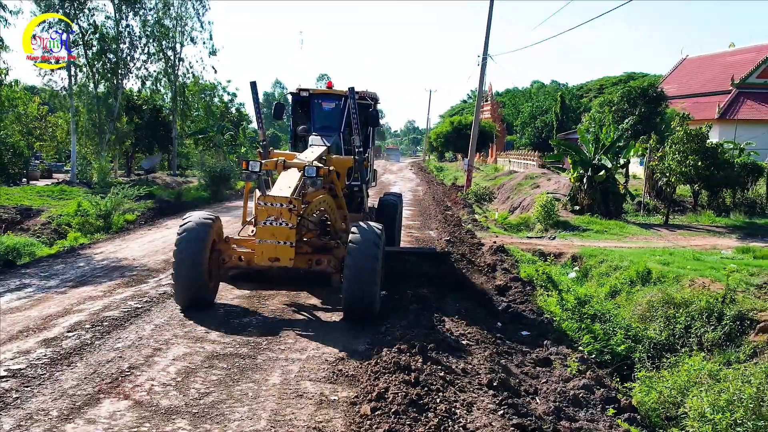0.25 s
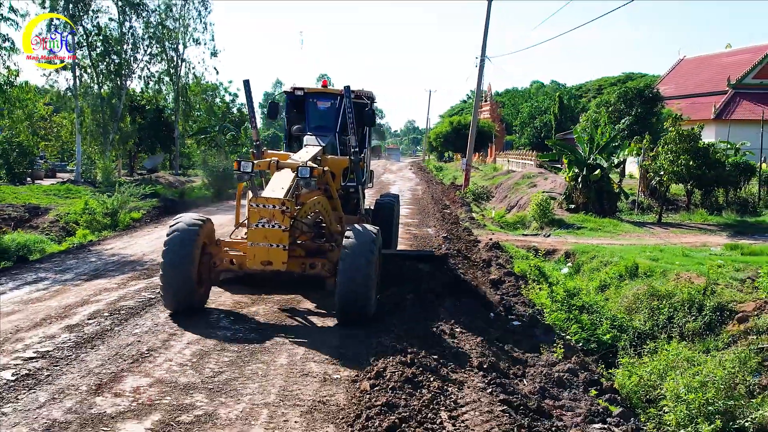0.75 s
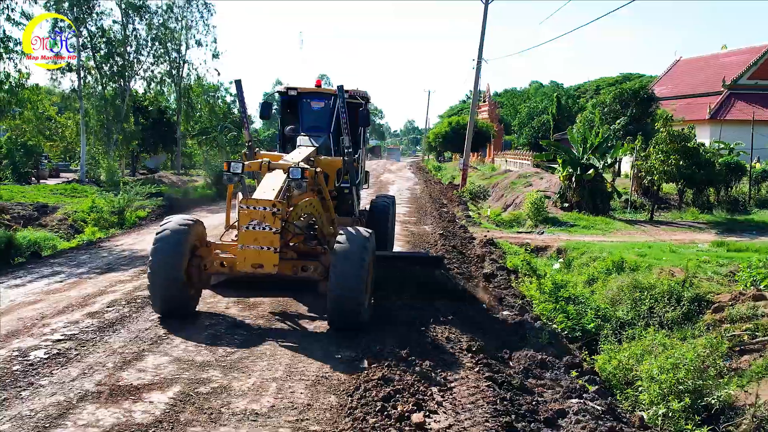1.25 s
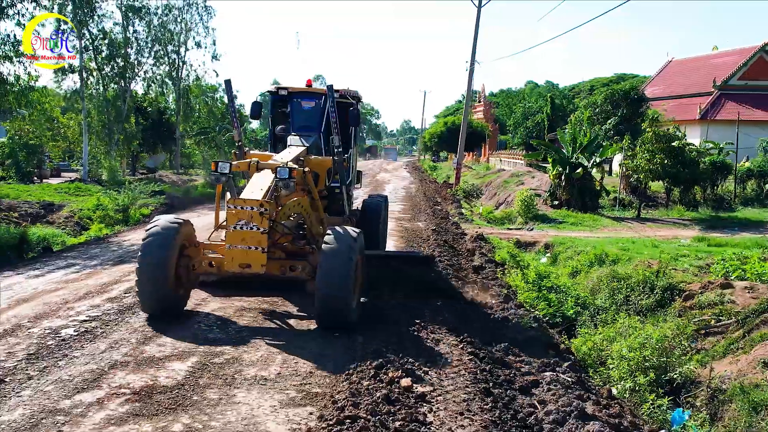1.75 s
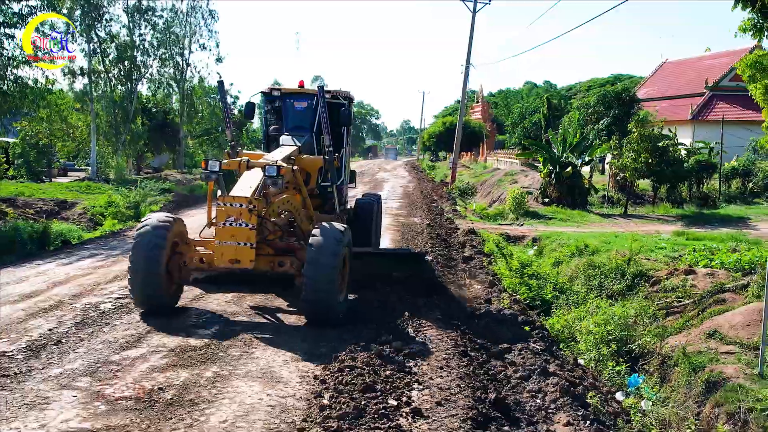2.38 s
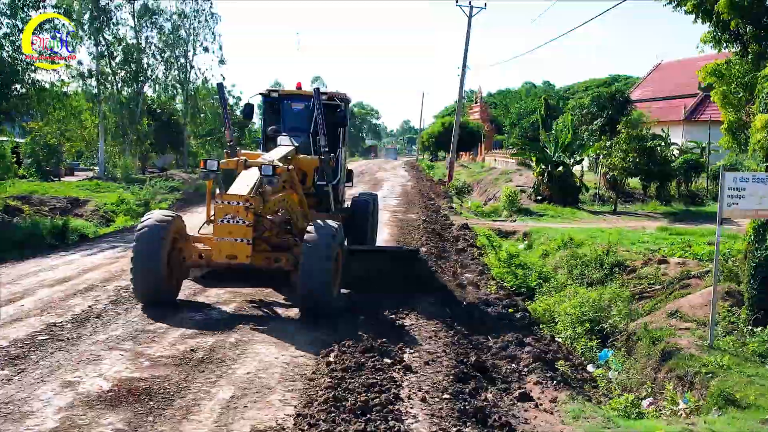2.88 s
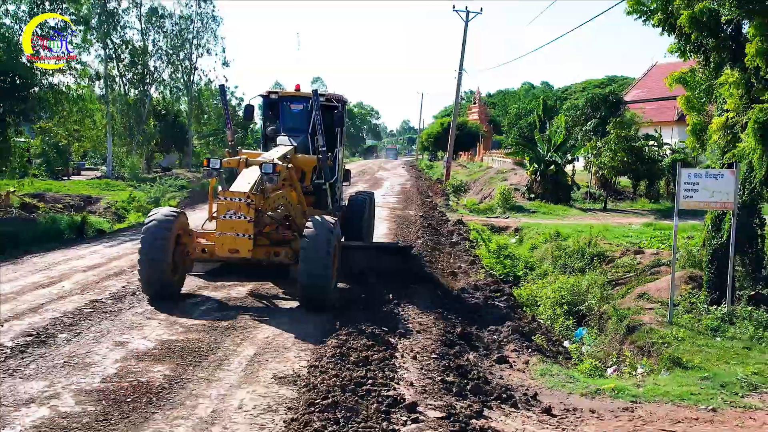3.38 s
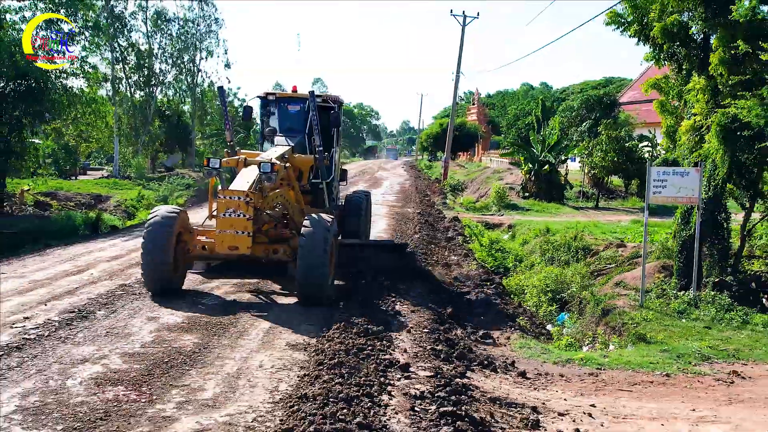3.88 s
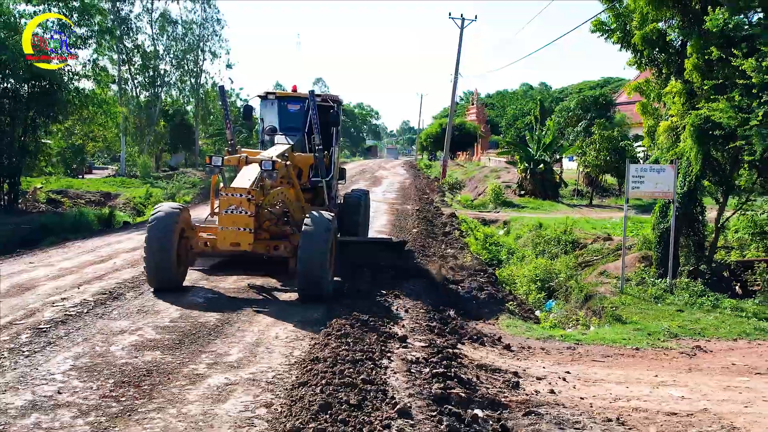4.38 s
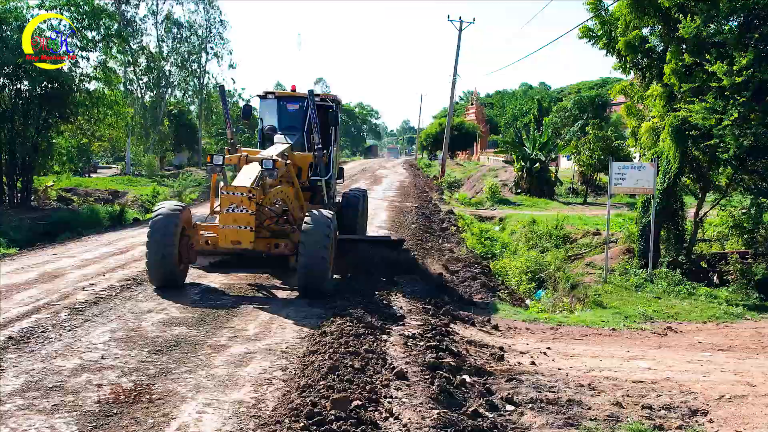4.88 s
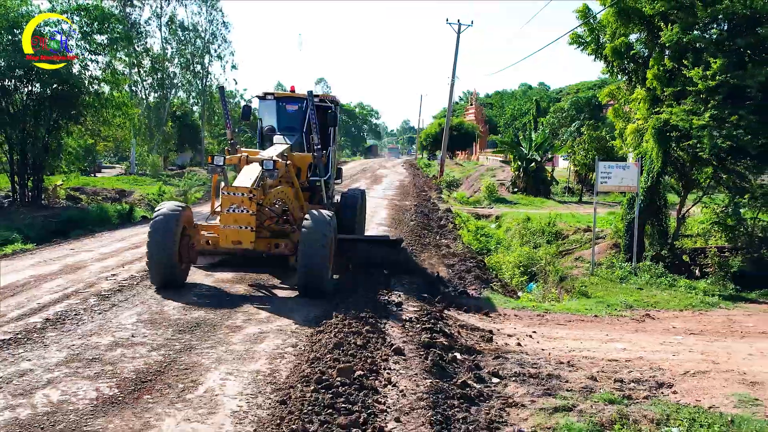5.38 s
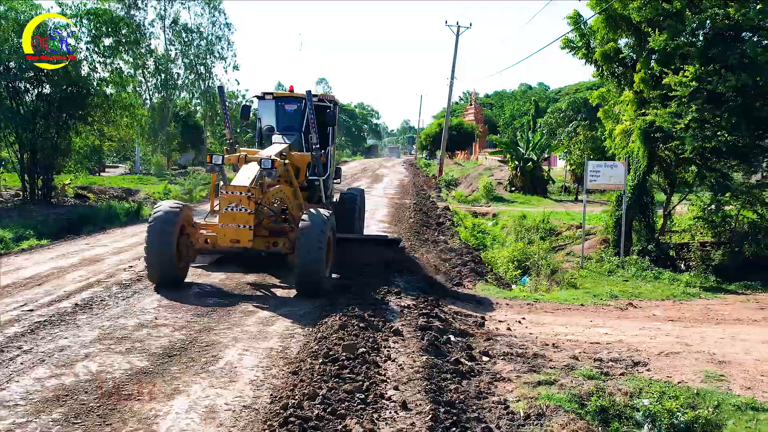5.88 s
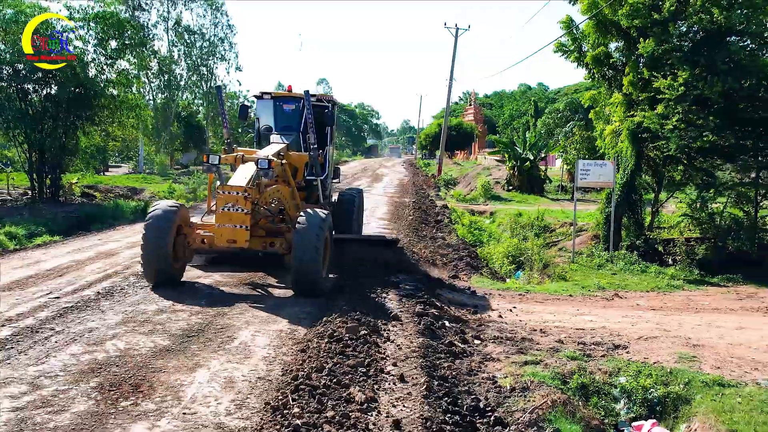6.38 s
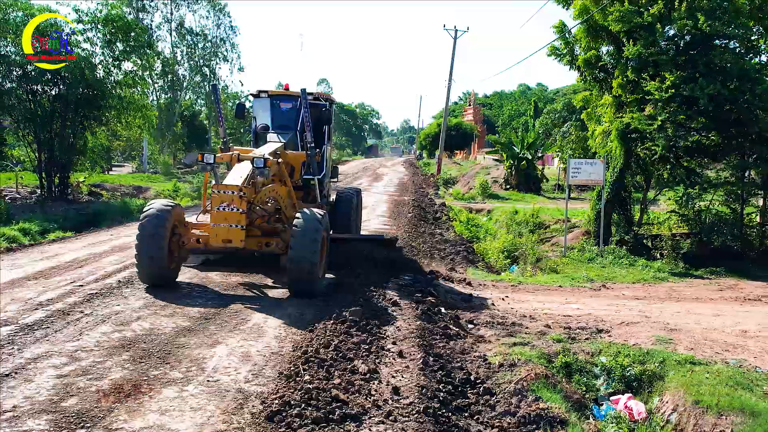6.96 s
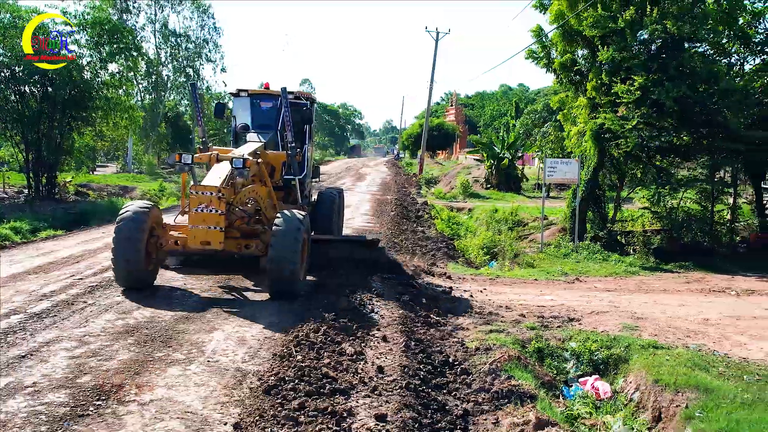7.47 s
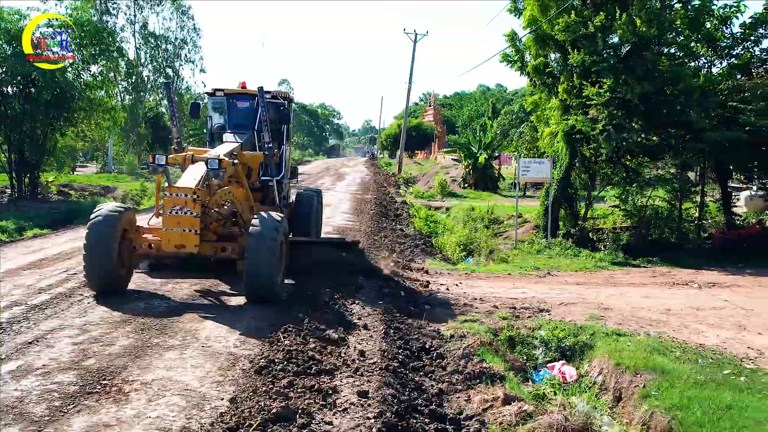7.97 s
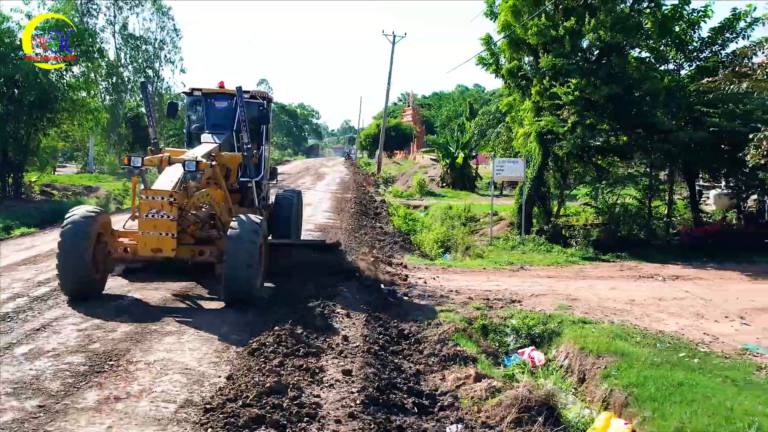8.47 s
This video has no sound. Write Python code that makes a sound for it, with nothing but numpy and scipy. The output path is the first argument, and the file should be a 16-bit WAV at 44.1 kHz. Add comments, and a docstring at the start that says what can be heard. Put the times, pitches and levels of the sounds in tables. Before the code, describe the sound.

A road grader runs on a dirt road some metres from the microphone for the whole of nearly nine seconds. Its diesel engine makes a steady, rough roar with a strong low fan hum and a high gear whine, both wavering slightly in pitch. The whine is loudest at about 1.2 seconds and weaker after 5 seconds. A first gust of wind bumps the microphone at about 1.5 seconds. From 3 seconds the wind buffets irregularly, with low thumps, knock-like pops and short crackles, hitting hard around 3.5 seconds. A very faint, high rustle sounds close by between 4 and 5 seconds. More gusts and pops come from about 5.8 to 6.8 seconds. After a short lull, the densest run of buffeting and crackling lasts from 8 seconds to the end, with the engine still droning underneath.

```python
"""A road grader works its six-cylinder diesel some metres away on a dirt road.
Firing, fan blades and a hunting gear mesh sing over the roar of engine and blade;
the ground bounce cancels a drifting band of that roar. Wind eddies buffet the microphone
in gusts, pops and crackles. A short rustle sounds close by, over a faint rumble."""
import sys
import numpy as np
from scipy import signal
from scipy.fft import rfft, irfft, next_fast_len
from scipy.io import wavfile
from scipy.ndimage import uniform_filter1d, minimum_filter1d

SR = 44100
rng = np.random.default_rng(int(sys.argv[2]) if len(sys.argv) > 2 else 0)


def transcribe(u):
    """Save the signal u as a 16-bit wav file named by the first command-line argument.

    u: samples, shape (n,) or (channels, n), limited to [-1, 1]; the rate is SR.
    q: integer samples, one column per channel.
    """
    v = np.clip(np.atleast_2d(u).T, -1, 1)
    q = np.round(v * 32767).astype(np.int16)
    wavfile.write(sys.argv[1], SR, q)


N = 384993

# rustle bunches: start/s, end/s, level/dB
RUSTLE_BUNCHES = [(4.08, 4.1, -67), (4.197, 4.25, -63), (4.324, 4.5, -57.5), (4.6, 4.62, -61),
                  (4.715, 4.82, -59.5), (4.96, 4.97, -65)]
# rustle spectrum: f/Hz, relative density/dB
RUSTLE_SPECTRUM = [(5500, -25), (7000, -2), (9500, 0.5), (12500, -2.5), (15500, -8)]

# gusts: t/s, peak level/dB, time to fall 10 dB/s (floored at 0.01)
GUSTS = [(1.47, -25, 0.3), (1.62, -30.5, 1.1), (2.0, -32, 0.9), (2.3, -31.5, 0.1), (3.11, -24, 0),
         (3.19, -25, 0.5), (3.3, -21.5, .15), (3.5, -14, 0.08), (3.7, -26, 0.5), (3.84, -26, 0.02),
         (3.93, -23, 0), (4.16, -26, 0.23), (4.24, -20.5, .07), (4.39, -25, 0.13), (4.6, -31.5, 3),
         (5.0, -30, 0.5), (5.14, -27.5, 0.35), (5.3, -27, 0.33), (5.55, -29, 0.4), (5.791, -18, .06),
         (5.9, -21.5, 0), (6.02, -21.5, 0.18), (6.171, -23, -0.2), (6.54, -24.5, 0.05), (6.65, -18, .15),
         (6.78, -25.5, .1), (7.13, -25.5, 0.02), (7.7, -30, .2), (7.779, -23.5, 0.27), (8.0, -19, 0.3),
         (8.1, -17, -0.03), (8.3, -22, .3), (8.45, -21.5, 0.2), (8.56, -19, .2), (8.66, -18.5, 0.3)]
# buffeting spectra, lows and upper edge: f/Hz, relative density/dB
WIND_LOW_SPECTRUM = [(25, -34), (50, -7.5), (85, 4), (150, 6.5), (300, 0), (500, -7), (900, -40.5)]
WIND_EDGE_SPECTRUM = [(300, -10), (550, -4), (900, -4), (1600, -19), (3000, -38), (4200, -56)]
# wind pops: t/s, amplitude (+ push, - pull), centre f/Hz
POPS = [(1.469, -0.43, 230), (3.0909, -0.42, 140), (3.1082, 0.44, 170), (3.18, .5, 171), (3.254, -0.1, 130),
        (3.5163, .7, 120), (3.557, -0.78, 140.1), (3.571, 0.57, 250), (3.593, -1.3, 220),
        (4.0365, -.37, 360), (4.3967, 0.48, 129.4), (5.756, 0.04, 120), (5.7944, .69, 240),
        (5.8849, 1, 140), (6.0004, 0.49, 280), (6.181, 0.54, 430), (6.4385, -.34, 130), (6.5418, 0.46, 170),
        (6.5715, 0.58, 120), (6.6528, -0.57, 240), (6.7907, 0.78, 240), (6.861, .4, 290),
        (7.1106, -0.28, 220), (8.0441, -0.7, 211), (8.0891, -0.92, 430), (8.1007, 0.8, 470),
        (8.1291, 0.45, 370), (8.2809, -0.62, 300), (8.3074, -.38, 460), (8.3537, -0.6, 180),
        (8.4332, -0.48, 200), (8.473, -.53, 240), (8.4928, -1, 171.3), (8.5497, .57, 300),
        (8.6571, -0.69, 216)]
# crackles in the gusts: t/s, level/dB
CRACKLES = [(3.468, -9.5), (3.543, -8.5), (3.567, -16), (4.232, -15), (4.394, -16.5), (5.998, -24),
            (6.179, -15.5), (6.645, -12), (7.75, -34), (8.088, -13), (8.307, -14.5), (8.43, -12.5),
            (8.472, -14.5), (8.547, -10), (8.584, -12.5), (8.621, -16.5)]
# crackle spectrum: f/Hz, relative density/dB
CRACKLE_SPECTRUM = [(350, -8.5), (700, 5), (1500, -12.5), (2600, -26.5), (4000, -45), (4600, -66)]

# roar of engine and blade: t/s, level/dB
ROAR_LEVEL = [(0.0, -34.5), (0.61, -34.5), (2.99, -37.5), (3.5, -35.5), (3.62, -42), (4.08, -43.5),
              (4.33, -40), (5.52, -38.5), (5.71, -35.5), (5.93, -40.5), (8.34, -38.5), (8.58, -43),
              (8.73, -43)]
# rasp, also steering the gear's second harmonic: t/s, level/dB re roar
RASP_LEVEL = [(0, -18), (1.9, -14.5), (2.9, -12.5), (3.6, -11.5), (4.8, -10.5), (5.6, -10.5), (7.0, -14),
              (7.55, -10), (8.73, -14)]
# treble chatter: t/s, level/dB
CHATTER_LEVEL = [(0, -53), (1.95, -69), (2.92, -76.5), (3.5, -72), (3.7, -88.5), (5.15, -89.5), (5.6, -72),
                 (7.25, -65), (7.6, -69), (8.73, -73)]
# machine noise spectra: f/Hz, relative density/dB
ROAR_SPECTRUM = [(40, -39.5), (75, -11), (110, -9.5), (170, 2), (260, -9), (450, -14), (900, -13.5),
                 (1400, -15), (2100, -18.5), (2700, -38.5), (3250, -50), (3500, -55), (4400, -62.5),
                 (4900, -92), (6000, -61)]
RASP_SPECTRUM = [(2000, -8.5), (2450, -5), (2900, -14), (3300, -22.5)]
CHATTER_SPECTRUM = [(3600, -19), (3740, -3), (3820, -9.5), (3900, 0), (4020, -6), (4200, -21.5)]
HISS_SPECTRUM = [(5800, -39.5), (6400, 1.5), (7500, 2), (8800, -3), (9400, -14), (10200, -7),
                 (11500, -22.5), (13500, -29), (15500, -35.5)]
# ground-bounce notch: t/s, f/Hz, share removed (0-1)
GROUND_NOTCH = [(0, 1300, 0.43), (1.4, 1380, 0.66), (2.4, 1557, .6), (3.2, 1515, 0.66), (3.8, 1420, 0.5),
                (4.8, 1550, 0.26), (5.3, 1285, 0.8), (6.5, 1320, 0.8), (7.3, 1400, 0.57), (8.1, 1390, 0.56)]

# gear mesh, mean tooth rate: t/s, f/Hz
TOOTH_RATE = [(0, 1116), (1.3, 1114), (2.15, 1144), (2.8, 1086), (3.25, 1057), (3.7, 1087), (4.6, 1091),
              (5.3, 1060), (6.5, 1058), (6.9, 1071), (7.2, 1110), (7.5, 1106), (8.1, 1072), (8.73, 1056)]
# hunting of the tooth rate: t/s, phase/cycles, swing either way/Hz
GEAR_HUNT = [(.13, 1.5, 5.4), (1.02, 2, 11), (1.85, 4, 7), (2.98, 7, 7.2), (3.73, 9, 6), (4.76, 12, 9),
             (5.14, 13, 13.3), (5.6, 14, 10), (6.37, 16, 5.4), (7.2, 18, 5.8), (7.52, 19, 9.3),
             (7.93, 20, 8), (8.62, 22, 8.5)]
# mesh fundamental: t/s, level/dB
GEAR_LEVEL = [(0.0, -34), (0.34, -22), (1.0, -22.5), (1.22, -16.5), (1.63, -24.5), (1.82, -33),
              (2.38, -28.5), (2.55, -39.5), (2.7, -25.5), (4.08, -28), (4.16, -24), (5.23, -25), (5.3, -34),
              (5.69, -26), (5.81, -34.5), (7.25, -33.5), (7.29, -27), (7.71, -39), (7.93, -27.5),
              (8.73, -33)]
# mesh harmonics 3-7 as casing and microphone pass them: f/Hz, level/dB re roar
CASING_RESPONSE = [(3180, -21.5), (3330, -22.5), (3450, -30), (4230, -27.5), (4360, -33), (4600, -47),
                   (5280, -47), (5550, -32), (5750, -34), (6350, -25), (6520, -35.5), (6700, -25),
                   (7600, -34)]
# fan: t/s, blade rate/Hz, level/dB
FAN = [(0, 241.6, -20), (.4, 238.4, -18), (1.2, 236.9, -15.5), (2.14, 238.4, -16), (2.36, 227.3, -21),
       (2.6, 224.3, -16), (2.8, 221.8, -19.5), (3.25, 222, -17), (3.47, 230.7, -25), (4.72, 229.4, -27.5),
       (4.88, 218.3, -18.5), (5.3, 222.1, -19), (6.2, 226.6, -25.5), (7.0, 229.6, -23.5), (7.5, 233, -21),
       (8.1, 233.2, -24.5), (8.73, 228.5, -23)]
# crank orders (3 is the firing): order, mean level/dB, flutter share (0-1)
CRANK_ORDERS = [(3, -32, 0.09), (5, -35.5, 0.7), (6, -36.5, 1)]

FAN_BLADES, FIRINGS_PER_TURN = 7, 3


def undb(db):
    """dB to gain."""
    return 10 ** (np.asarray(db) / 20)


def tracks(table):
    """Each column after t, interpolated per sample."""
    times_s, *columns = np.transpose(table)
    return [np.interp(np.arange(N) / SR, times_s, column) for column in columns]


def colour(x, points, lo_hz, hi_hz):
    """Filter x by (f/Hz, level/dB) points; rms 1 within lo_hz..hi_hz."""
    n = next_fast_len(N, True)
    bin_hz = np.arange(n // 2 + 1) * SR / n + 1
    hz, db = np.transpose(points)
    gain_db = np.interp(np.log(bin_hz), np.log(hz), db, left=-90, right=-90)
    spectrum = rfft(np.pad(x, (0, n - N), "reflect")) * undb(gain_db)
    band = (bin_hz > lo_hz) & (bin_hz < hi_hz)
    return irfft(spectrum, n)[:N] * n / np.sqrt(2 * np.sum(np.abs(spectrum[band]) ** 2))


def wander(rate_hz):
    """Random steps at rate_hz, smoothed twice; spread near 1."""
    hold = int(SR / rate_hz)
    steps = np.repeat(rng.standard_normal(N // 40), hold)[:N]
    return 1.3 * uniform_filter1d(uniform_filter1d(steps, hold), hold)


def tone(hz, rms_db, flutter, flutter_hz):
    """Sine that fades and slurs: a power share, flutter, arrives by shifting paths."""
    share = np.clip(flutter, 0, 1)
    paths = np.sqrt(1 - share) + np.sqrt(share / 2) * (wander(flutter_hz) + 1j * wander(flutter_hz))
    return np.sqrt(2) * undb(rms_db) * np.imag(paths * np.exp(2j * np.pi * np.cumsum(hz) / SR))


def patchy(x, depth_db, bins, frames):
    """Random swells in patches of bins (86 Hz each) by frames (6 ms each); rms kept."""
    *_, cells = signal.stft(np.pad(x, (0, 512), "reflect"), nperseg=512)
    field = uniform_filter1d(rng.standard_normal(cells.shape), bins, axis=0)
    field = uniform_filter1d(field, frames, axis=1)
    out = signal.istft(cells * undb(depth_db * field / field.std()), nperseg=512)[1][:N]
    return out * x.std() / out.std()


def swells(start_s, end_s, db, rise_s, fall_s, floor_db):
    """Envelope in dB of held swells, 10 dB per rise_s or fall_s on the flanks; powers add."""
    t = np.arange(0, N, 64) / SR
    start_s, end_s, db, fall_s = (np.reshape(c, (-1, 1)) for c in (start_s, end_s, db, fall_s))
    before_db = 10 * np.maximum(start_s - t, 0) / rise_s
    after_db = 10 * np.maximum(t - end_s, 0) / np.maximum(fall_s, .01)
    power = np.sum(undb(db - before_db - after_db) ** 2, axis=0) + undb(floor_db) ** 2
    return np.interp(np.arange(N) / SR, t, 10 * np.log10(power))


def rumble():
    """Faint steady noise below 60 Hz."""
    spectrum = [(4, -3.5), (25, -3), (45, -0.5), (60, -18)]  # f/Hz, relative density/dB
    return undb(-65.5) * colour(rng.standard_normal(N), spectrum, 20, 45)


def rustle():
    """Dense tiny treble clicks in bunches; faint ones throughout."""
    level_db = swells(*np.transpose(RUSTLE_BUNCHES), rise_s=0.054, fall_s=0.054, floor_db=-80)
    grains = rng.standard_normal(N) * undb(2.8 * wander(200))
    clicks = colour(grains, RUSTLE_SPECTRUM, 10500, 15500)
    return undb(level_db) * patchy(clicks, depth_db=2.1, bins=12, frames=4)


def crackles():
    """Bright bursts in the gusts, quick to start and die; the microphone port dulls them."""
    attack_s, t60_s = 0.0014, .047
    grit = colour(rng.standard_normal(N), CRACKLE_SPECTRUM, 670, 2500)
    envelope = np.zeros(N)
    t = np.arange(SR // 10) / SR
    for start_s, db in CRACKLES:
        i = int(start_s * SR)
        burst = np.minimum(t / attack_s, 1) * undb(db - 60 * t / t60_s)
        envelope[i:i + len(t)] += burst[:N - i]
    return signal.sosfilt(signal.butter(8, 3900, fs=SR, output="sos"), grit * envelope)


def pops():
    """The biggest eddies: one peaked push or pull each, with a rebound either side."""
    out = np.zeros(N)
    half = 700
    t = np.arange(-half, half) / SR
    for centre_s, amplitude, hz in POPS:
        u = np.pi * hz * t
        pulse = (1 - 2 * u ** 2) * np.exp(-u ** 2)
        tip = (1 - 2 * (3 * u) ** 2) * np.exp(-(3 * u) ** 2)
        i = int(centre_s * SR)
        out[i - half:i + half] += amplitude * (pulse + .15 * tip)
    return out


def wind():
    """Eddies hit the microphone port in lumps of a few ms, shared by lows and upper edge."""
    rise_s, edge_max_fall_s, calm_db = 0.074, .25, -48.5
    peak_s, peak_db, fall_s = np.transpose(GUSTS)
    low_db = swells(peak_s, peak_s, peak_db, rise_s, fall_s, calm_db)
    edge_peak_db = peak_db - 7 + 0.24 * (peak_db + 22)  # harder gusts are brighter
    edge_db = swells(peak_s, peak_s, edge_peak_db, rise_s, np.minimum(fall_s, edge_max_fall_s), calm_db)
    eddies = rng.standard_normal(N) * undb(8.1 * np.tanh(wander(90) / 2))
    low = colour(eddies, WIND_LOW_SPECTRUM, 249.5, 420)
    fine_eddies = eddies * undb(8.3 * np.tanh(wander(150) / 2))
    edge = colour(fine_eddies, WIND_EDGE_SPECTRUM, 410, 950)
    port_leak = signal.butter(2, 45, "high", fs=SR, output="sos")
    return signal.sosfilt(port_leak, undb(low_db) * low + undb(edge_db) * edge + pops())


def chatter():
    """Faint patchy noise near 3.9 kHz."""
    (level_db,) = tracks(CHATTER_LEVEL)
    band = colour(rng.standard_normal(N), CHATTER_SPECTRUM, 3600, 4100)
    return undb(level_db) * patchy(band, depth_db=5.5, bins=2, frames=5)


def ground_bounce(x):
    """The ground reflection partly cancels a drifting band."""
    notch_hz, share = tracks(GROUND_NOTCH)
    carrier = np.exp(2j * np.pi * np.cumsum(notch_hz) / SR)
    baseband = signal.filtfilt(*signal.butter(1, 110, fs=SR), x / carrier)
    return x - share * 2 * np.real(carrier * baseband)


def roar(crank_hz, roar_db, rasp_re_roar_db):
    """Engine and blade noise, lightly pulsed by the firing; rasp and hiss above it."""
    hiss_re_roar_db = -19
    firing_rad = 2 * np.pi * np.cumsum(FIRINGS_PER_TURN * crank_hz) / SR
    drive = rng.standard_normal(N) * (1 + 0.031 * np.cos(firing_rad)) * undb(0.61 * wander(12))
    body = ground_bounce(colour(drive, ROAR_SPECTRUM, 1483, 1906))
    rasp = patchy(colour(drive, RASP_SPECTRUM, 2310, 3300), depth_db=4.5, bins=2, frames=8)
    hiss_drive = rng.standard_normal(N) * undb(0.7 * wander(9))
    hiss = patchy(colour(hiss_drive, HISS_SPECTRUM, 6800, 9000), depth_db=2.6, bins=2, frames=10)
    return undb(roar_db) * (body + undb(rasp_re_roar_db) * rasp + undb(hiss_re_roar_db) * hiss)


def gear_whine(roar_db, rasp_re_roar_db):
    """Teeth mesh at a hunting rate; harmonics 2-7 flare and flutter."""
    (mean_hz,) = tracks(TOOTH_RATE)
    hunt_cycles, swing_hz = tracks(GEAR_HUNT)
    tooth_hz = mean_hz + swing_hz * np.cos(2 * np.pi * hunt_cycles)
    (gear_db,) = tracks(GEAR_LEVEL)
    flutter = 0.043 * undb(-19.5 - gear_db)  # shifting paths show as the direct whine weakens
    out = tone(tooth_hz, gear_db, flutter, flutter_hz=30)
    second_db = roar_db + rasp_re_roar_db + 8 + 2.1 * wander(9)
    out += tone(2 * tooth_hz, second_db, flutter=.9, flutter_hz=60)
    for k in range(3, 8):
        casing_db = np.interp(k * tooth_hz, *np.transpose(CASING_RESPONSE))
        flare_db = 4.5 * wander(9)
        out += tone(k * tooth_hz, roar_db + casing_db + flare_db, flutter=.9, flutter_hz=22 * k)
    return out


def fan(blade_hz, fan_db):
    """Blade-pass tone; its second harmonic grows as the fan slows."""
    second_db = -40.5 + .8 * (228 - blade_hz)
    fundamental = tone(blade_hz, fan_db, flutter=0.04, flutter_hz=12)
    return fundamental + tone(2 * blade_hz, second_db, flutter=0.17, flutter_hz=9)


def diesel(crank_hz, roar_db):
    """Firing tone and higher crank orders, rising and falling with the roar."""
    swing_db = roar_db - np.mean(roar_db)
    return sum(tone(order * crank_hz, db + swing_db, flutter, flutter_hz=9)
               for order, db, flutter in CRANK_ORDERS)


def scene():
    """Grader, wind, rustle and rumble at one microphone."""
    blade_hz, fan_db = tracks(FAN)
    crank_hz = blade_hz / FAN_BLADES
    (roar_db,) = tracks(ROAR_LEVEL)
    (rasp_re_roar_db,) = tracks(RASP_LEVEL)
    tones = fan(blade_hz, fan_db) + diesel(crank_hz, roar_db) + gear_whine(roar_db, rasp_re_roar_db)
    grader = tones + roar(crank_hz, roar_db, rasp_re_roar_db) + chatter()
    return (grader + wind() + crackles() + rustle() + rumble())[None]


def record(dry):
    """Fast limiter on the loudest pops, then a steep low-pass."""
    ceiling, span_samples, cutoff_hz = .86, 221, 15600
    gain = np.minimum(1, ceiling / np.maximum(np.abs(dry), 1e-9))
    gain = minimum_filter1d(gain, span_samples)
    gain = uniform_filter1d(uniform_filter1d(gain, span_samples // 2), span_samples // 2)
    return signal.sosfilt(signal.ellip(10, .2, 80, cutoff_hz, fs=SR, output="sos"), gain * dry)


dry = scene()
out = record(dry)
transcribe(out)
```